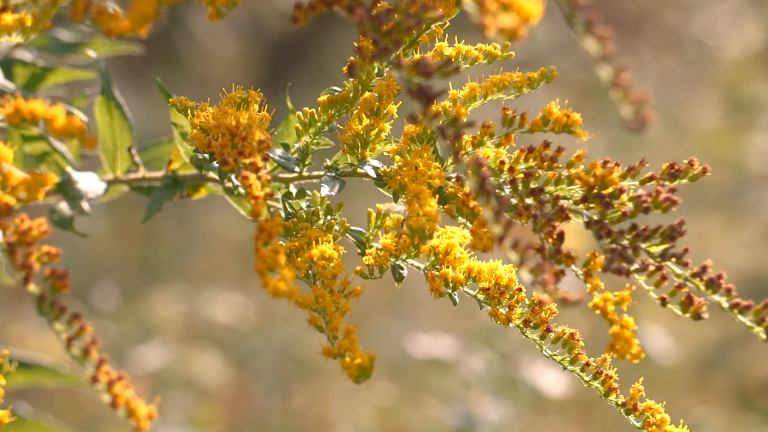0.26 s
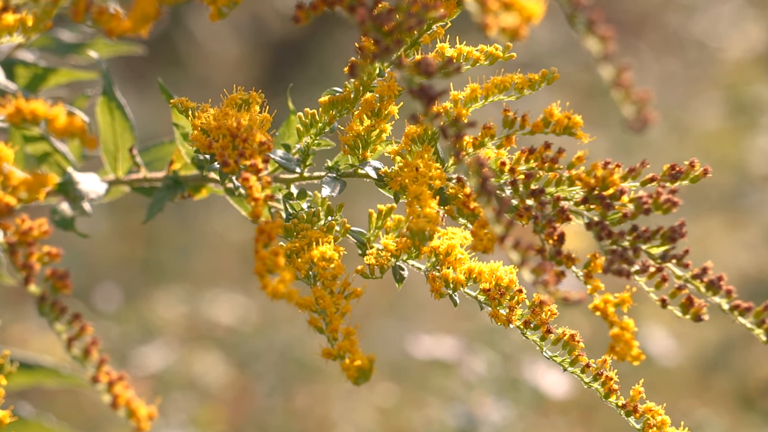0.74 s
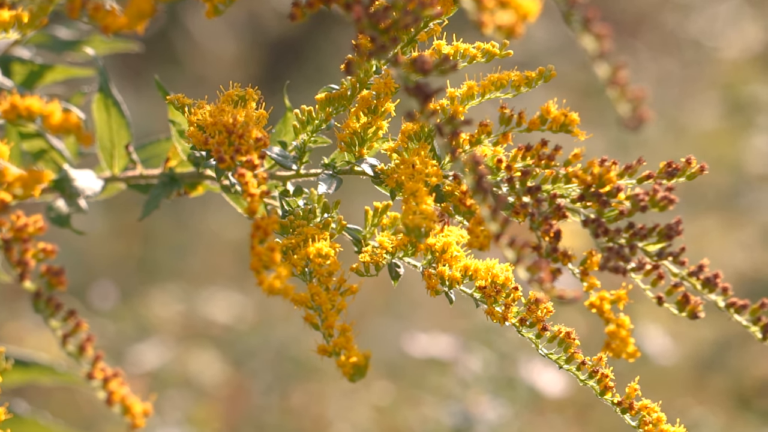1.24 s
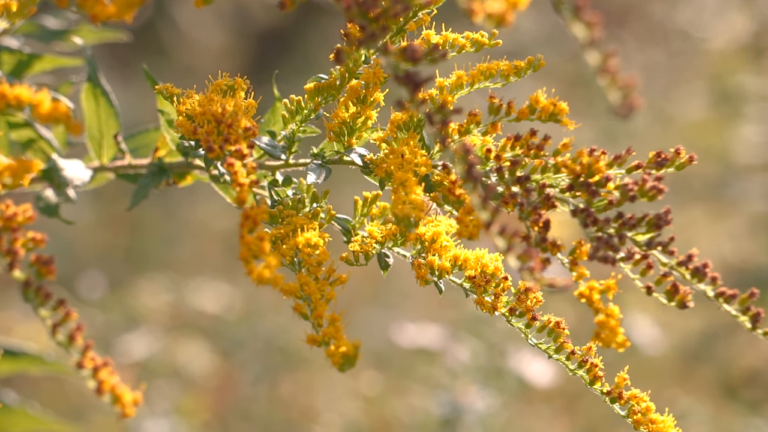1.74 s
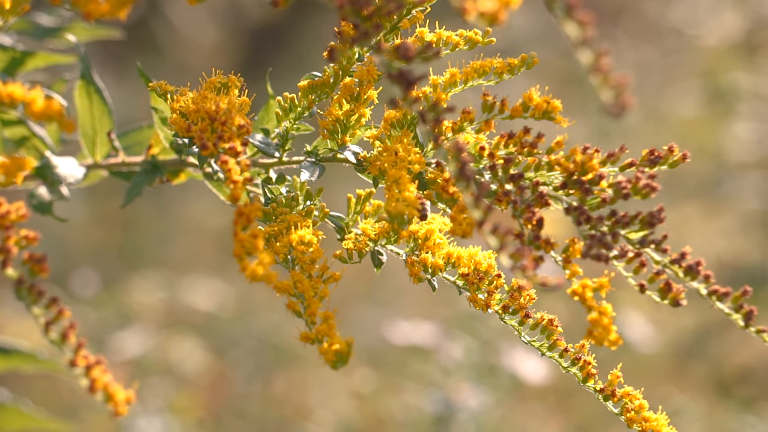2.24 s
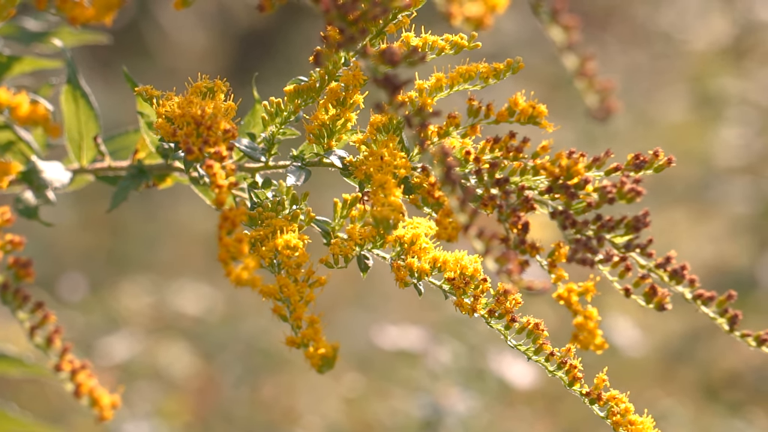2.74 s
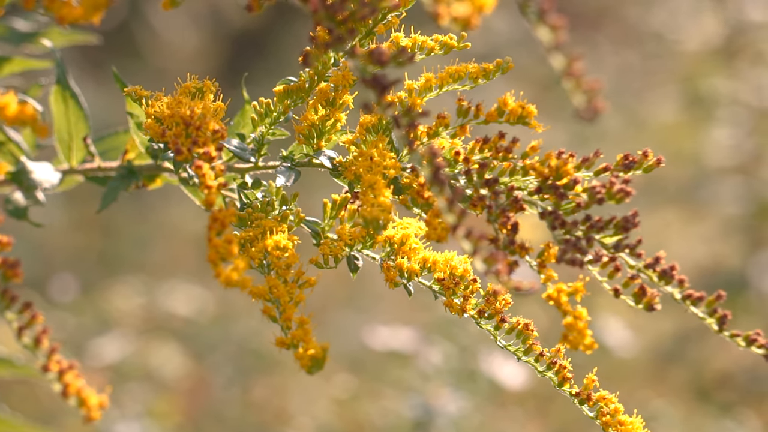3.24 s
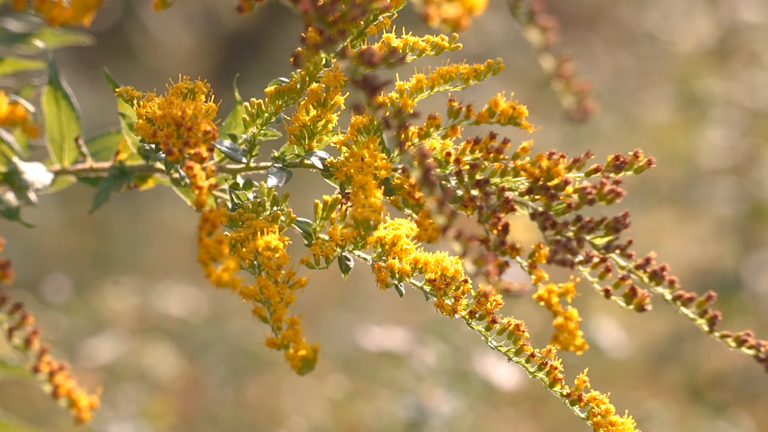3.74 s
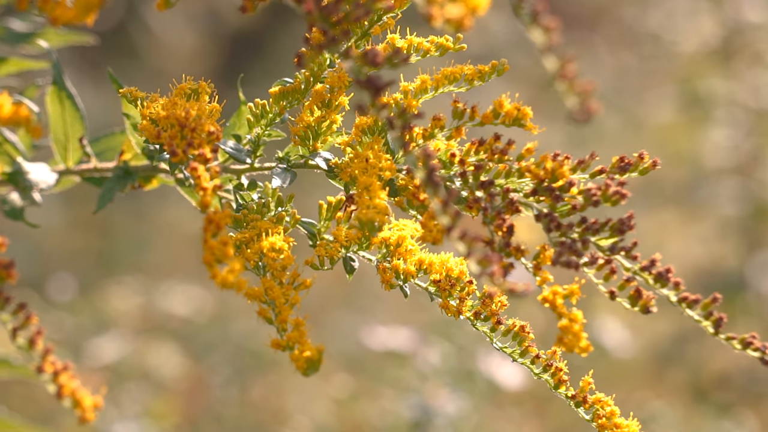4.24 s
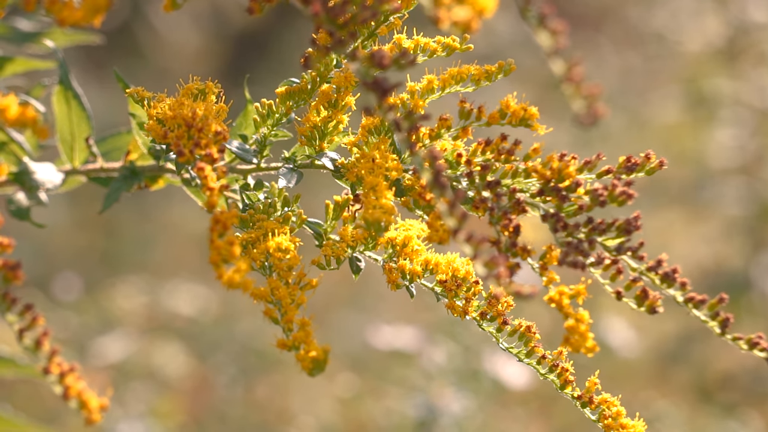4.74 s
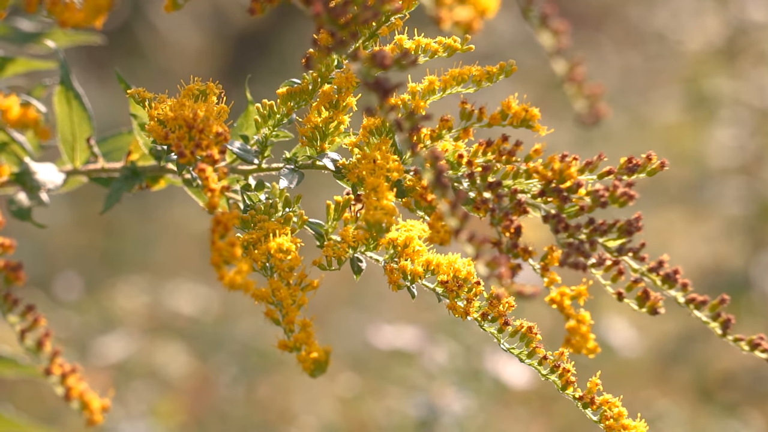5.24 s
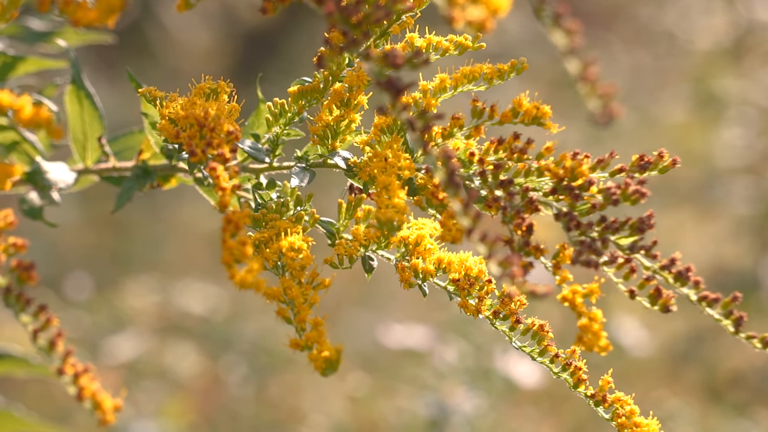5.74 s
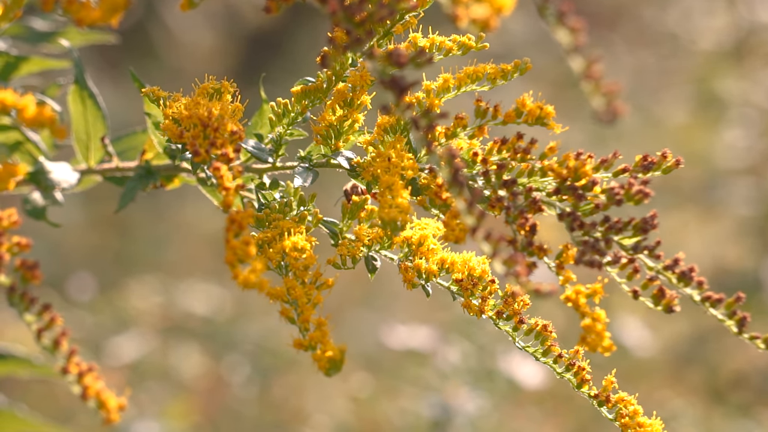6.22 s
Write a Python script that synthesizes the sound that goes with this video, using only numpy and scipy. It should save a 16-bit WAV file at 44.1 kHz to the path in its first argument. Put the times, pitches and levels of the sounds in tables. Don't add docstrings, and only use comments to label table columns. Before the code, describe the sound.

Continuous high cricket trilling, nearest on the left, with pulsing chirps among it and one sharp clicking rasp early on.

```python
import sys
import numpy as np
from scipy import signal
from scipy.io import wavfile
from scipy.ndimage import uniform_filter1d

SR = 44100
rng = np.random.default_rng(int(sys.argv[2]) if len(sys.argv) > 2 else 0)


def dump(signal):
    limited = np.clip(np.atleast_2d(signal).T, -1, 1)
    pcm = np.round(limited * 32767).astype(np.int16)
    wavfile.write(sys.argv[1], SR, pcm)


def gain_from_db(level_db):
    decades = np.asarray(level_db, float) / 20
    return 10 ** decades


N = 285768


def evened(x):
    return x / np.sqrt(np.mean(x ** 2) + 1e-20)


def add(mix, s, sound):
    part = mix[:, max(round(s * SR), 0):][:, :sound.shape[1]]
    part += sound[:, :part.shape[1]]


def strokes(count, first_hz, last_hz, bend, share, late, uneven, left_db, right_db, lead, soft=0.67):
    which, place = np.divmod(count + .5, 1)
    which = (which - which.min()).astype(int)
    luck = rng.standard_normal((which.max() + 1, 3))
    luck[:, 2] = np.cumsum(luck[:, 2])
    size, tune, slip = luck[which].T

    along = np.clip((place - .5) / share + .53, 0, 1)
    hz = first_hz + (last_hz - first_hz) * along ** bend
    hz = hz * (1 + .006 * uneven * tune)
    turns = np.cumsum(hz) / SR
    turns -= turns[np.searchsorted(which, which)]
    angle = 2 * np.pi * turns + (1.4 + 9 * uneven) * slip

    grit = uniform_filter1d(uniform_filter1d(rng.standard_normal(len(hz)), size=80), size=80)
    catch = 1 + .9 * uneven * evened(grit)
    swell = np.sin(np.pi * along ** late) ** soft * gain_from_db(6.7 * uneven * size) * catch
    angle = angle + np.array([[0], [lead]])
    overtone = gain_from_db(-31) * np.cos(3 * angle) if first_hz < 4400 else 0
    return swell * gain_from_db([[left_db], [right_db]]) * (np.cos(angle) + overtone)


def singers():
    # (time [s], lead [strokes])
    near = [(0, -.278), (2.3, -.372), (4.3, -.578), (5.2, -.552), (6.48, -.585)]
    high = [(0, .34), (1.9, .27), (3.2, .39), (3.55, .08), (5.5, -.17), (6.1, -.56), (6.48, -.52)]
    low = [(0, .43), (3, .36), (6.48, .36)]
    middle = [(0, .34), (.6, .37), (2.36, .06), (3.8, .2), (6.48, -.27)]
    sweeper = [(0, .36), (1.8, .5), (5.9, .5), (6.48, .62)]
    thin = [(0, -.05), (.8, .8), (2.4, .2), (4.3, 1.47), (5.3, 1.28), (6.48, .39)]
    beats = [54.3, 19.4, 53.16, 69.49, 68.32, 71.79]
    # (first pitch [Hz], last pitch [Hz], late fall [exponent], sounding share of a stroke [0-1],
    # late peak [exponent], unevenness [0-1], left [dB], right [dB], right leads [rad], soft edges [exponent])
    voices = [
        (4335, 4140, .9, .5, 1.75, .04, 7.5, -11.5, -2.5, .62),
        (8410, 7750, 2, .45, 1.17, .2, -3.5, 7.5, -1.76),
        (4166, 3800, .92, .55, .87, .08, -7.5, 8, -2.5),
        (4820, 4600, .8, .6, 1.1, .18, 7.5, 4.5, -2.1),
        (5580, 4950, 1.06, .55, 1.5, 0.19, 3, 12, 3.1),
        (5870, 5350, 0.72, 0.49, 1.05, 0.22, 10.5, 3, 2.3),
    ]
    # (level at the start [dB], growth [dB/s])
    efforts = [(-25.5, 0.19), (-33, -0.16), (-40, -0.57), (-40.5, 1), (-47.5, 0.17), (-55.5, 1.3)]

    t, out = np.arange(N) / SR, np.zeros((2, N))
    drifts = [near, high, low, middle, sweeper, thin]
    for drift, beat, (db, db_per_s), voice in zip(drifts, beats, efforts, voices):
        count = beat * t + np.interp(t, *np.transpose(drift))
        out += gain_from_db(db + db_per_s * t) * strokes(count, *voice)
    return out


def chirper():
    # (middle stroke [s], level [dB])
    chirps = [(.14, -32), (.528, -30), (.865, -31), (1.409, -33), (1.746, -29.5), (2.116, -32),
              (2.504, -31), (2.852, -33), (3.32, -31), (3.66, -30.5), (4.035, -30.5), (4.334, -30),
              (4.615, -30), (4.928, -31), (5.288, -32), (5.842, -30), (6.281, -30)]
    gap_s, rise_db = .035, 1.5
    out = np.zeros((2, N))
    for s, db in chirps:
        for step in (-1, 0, 1):
            count = np.linspace(-.5, .49, 1400)
            stroke = strokes(count, 5594, 5470, 0.96, 0.6, 0.8, 0.17, -7, 0, 2.2)
            add(out, s + step * gap_s - .016, gain_from_db(db + step * rise_db) * stroke)
    return out


def resonate(x, hz, width):
    turn = np.exp(2j * np.pi * hz * np.arange(x.shape[-1]) / SR)
    r = np.exp(-np.pi * width / SR)
    return 2 * (turn * signal.lfilter([1 - r], [1, -r], x / turn)).real


def katydid():
    # (time [s], length [s], level [dB], left over right [dB], thinness [dB/kHz])
    rasps = [(.918, .01, -44, 0, 0), (.942, .011, -33, 7, 1), (0.96, 0.014, -28.5, 8, 2.5),
             (1.713, .011, -35, 0, 2), (1.739, .011, -28, -1, 3), (1.759, 0.014, -25, 0, 2),
             (1.7876, 0.015, -10.5, 1.5, 0.5), (3.28, .02, -45, 0, 1), (4, .03, -46, 0, 1),
             (5.25, .02, -44, 0, 1), (5.8, .02, -45, 0, 1)]
    # (pitch [Hz], width [Hz], left [dB], right [dB])
    wing = [(10300, 1700, -3, -8), (11950, 1500, 1.5, -9), (12700, 1400, -1.5, -1), (14500, 1500, -9, 0),
            (15100, 1300, -6, -6)]
    out = np.zeros((2, N))
    for s, length, db, lean_db, thin_db in rasps:
        along = np.linspace(0, 1, round(length * SR))
        luck = rng.random((1500, 3))[:len(along)]
        struck = luck[:, 0] < 16000 / SR
        teeth = struck * np.sign(luck[:, 1] - .5) * gain_from_db(5.8 * luck[:, 2])
        pressure = np.minimum((along / .3) ** 2 + .15, 1)
        scrape = np.pad(evened(teeth) * pressure, (0, 300))
        for k, (hz, width, left_db, right_db) in enumerate(wing):
            sides_db = np.array([[left_db + lean_db / 2], [right_db - lean_db / 2]])
            level_db = db + thin_db * (hz - 13500) / 1000 + sides_db
            ring = resonate(resonate(scrape, hz, width), hz, width)
            add(out, s, (-1) ** k * 1.1 * gain_from_db(level_db) * ring)
    return out


def grass(x, t60):
    taps = np.zeros((2, SR // 4))
    at = np.arange(60, SR // 4 - 20, 20) + rng.integers(0, 20, (2, (SR // 4 - 61) // 20))
    np.put_along_axis(taps, at, rng.choice([-1., 1.], at.shape), 1)
    taps *= gain_from_db(-60 * np.arange(SR // 4) / SR / t60)
    return signal.fftconvolve(x, taps / np.linalg.norm(taps[0]), axes=1)[:, :N]


def read(points, hz):
    f, *columns = np.transpose(points)
    return np.array([np.interp(np.log(hz + 1), np.log(f + 1), c) for c in columns])


def hiss(db_of, patchy_db):
    # (pitch [Hz], left-right likeness [0-1], right leads [rad])
    ports = [(30, .99, .1), (90, .93, .35), (260, .65, 1.3), (430, .67, 2.0), (700, .68, 2.4),
             (1300, .58, 2.4), (2000, .38, 2.3), (3000, .18, 2.4), (4500, .4, 4.0), (6200, .13, 3.0),
             (8300, .35, 4.5), (11000, .2, 5.8), (16000, .2, 4.8)]
    frames, hz = N // 256 + 5, np.fft.rfftfreq(1024, 1 / SR)
    a, b, c, d, patches = rng.standard_normal((frames, 513, 5)).T
    patches = evened(uniform_filter1d(uniform_filter1d(patches, 10, 0), 12, 1))
    same, lead = read(ports, hz)[:, :, None]
    left = a + 1j * b
    right = same * left * np.exp(1j * lead) + np.sqrt(1 - same ** 2) * (c + 1j * d)
    z = np.array([left, right]) * gain_from_db(db_of(hz)[:, :, None] + patchy_db * patches)
    return np.sqrt(SR / 1024) * signal.istft(z, nperseg=1024, noverlap=768)[1][:, :N]


def crowd():
    # (pitch [Hz], left [dB per Hz], right [dB per Hz])
    low_kinds = [(2630, -105, -111), (3550, -74, -76), (3750, -72, -73.5), (3924, -69, -59),
                 (4164, -53, -58.5), (4310, -66, -67), (4500, -72, -71), (4630, -62, -62),
                 (5140, -71.5, -70.5), (5504, -70, -71.5), (5900, -84, -74.5), (5850, -89, -102)]
    high_kinds = [(5880, -96.5, -96.5), (7150, -82, -77.5), (7844, -63, -68.5), (8310, -62, -60.5),
                  (8500, -65.5, -62), (8750, -70.5, -69.5), (9044, -68.5, -69.5), (9280, -91, -116),
                  (9800, -105, -105)]

    def colour_db(hz):
        return 20 * np.log10(gain_from_db(read(low_kinds, hz)) + gain_from_db(read(high_kinds, hz)))

    t, out = np.arange(N) / SR, hiss(colour_db, 0.38)
    for k, (pick, pace, side, turn) in enumerate(rng.random((16, 4))):
        high = k % 2
        pick = (k + 2 * pick) / 17
        hz = 7700 + 1400 * pick if high else 4650 + 1000 * pick
        beat = 17 + 4 * pace if high else 48 + 26 * pace
        sides_db = 5 * (side - .5) * np.array([1, -1])
        left_db, right_db = colour_db(np.array([hz]))[:, 0] + 25.5 - 4.5 * high + sides_db
        out += strokes(beat * t + turn, hz * 1.025, hz * .975, 1.213, 0.53, 2.4, 0.185,
                       left_db, right_db, 2 * np.pi * turn)
    return out


def hoots():
    # (time [s], length [s], pitch [Hz], level [dB], left over right [dB])
    far_calls = [(0.684, .14, 2240, -50.5, -5), (0.778, .14, 1700, -53, 1), (2.38, 0.17, 2200, -58, -9),
                 (0.054, 0.37, 1510, -56, 6), (2.18, .77, 1440, -62, 9), (4.246, 0.58, 1410, -58.5, -3),
                 (4.847, .45, 1394, -56.5, 4), (5.4, .6, 1510, -61, -1), (0, 0.44, 286, -55, 3),
                 (0.905, .22, 383, -59, 4), (0.979, 0.21, 255, -56.5, 8)]
    # (pitch [Hz], width [Hz], level [dB], left over right [dB])
    hums = [(116, 8, -78, 0), (173, 8, -69, 0), (12887, 8, -77, 8), (12947, 4, -70, 8), (13007, 8, -73, 8)]
    hoot_width_hz = 95
    out = np.zeros((2, N))
    tones = [(s, length, hz, hoot_width_hz, db, lean_db) for s, length, hz, db, lean_db in far_calls]
    tones += [(0, N / SR, *hum) for hum in hums]
    for s, length, hz, width, db, lean_db in tones:
        breath = rng.standard_normal(SR if length < .8 else N + SR)[:round((length + .2) * SR)]
        tone = evened(resonate(resonate(breath, hz, width), hz, width))
        tone = tone[round(.2 * SR):]
        fade = signal.windows.tukey(len(tone), min(.8, .2 / length))
        add(out, s, gain_from_db([[db + lean_db / 2], [db - lean_db / 2]]) * tone * fade)
    return out


def air():
    # (pitch [Hz], level [dB per Hz])
    colour = [(25, -122), (60, -101), (110, -91), (250, -78), (500, -73.5), (1000, -74), (2000, -78.5),
              (3500, -79.5), (6200, -84), (9400, -85), (10500, -84), (13500, -86), (14500, -85),
              (15500, -81)]
    # (pitch [Hz], left over right [dB])
    balance = [(60, -1), (180, 0), (550, 2), (1650, 4), (6000, 0.5), (15000, 1)]
    halves = np.array([[.5], [-.5]])
    return hiss(lambda hz: read(colour, hz) + read(balance, hz) * halves, 0.86)


def scene():
    trill, rasp = singers() + chirper(), katydid()
    echo = gain_from_db(-14) * np.pad(trill, ((0, 0), (round(.0055 * SR), 0)))[:, :N]
    scatter = gain_from_db(-16) * grass(trill[::-1], .17)
    rasp_tail = gain_from_db(-10) * grass(rasp, .14)
    return trill + echo + scatter + rasp + rasp_tail + crowd() + hoots() + air()


def drop_masked(x):
    # (from [Hz], to [Hz], level against the usual below which a band drops [dB])
    masked = [(1900, 3650, -2), (5880, 6400, -.3), (6400, 6950, -1.8), (6950, 7250, -.6), (9200, 9600, .7),
              (9600, 10300, 0), (10300, 20000, -2.8)]
    unmasked_db = -9
    window = np.sin(np.pi * (np.arange(2048) + .5) / 2048)
    frame = dict(window=window, nperseg=2048, noverlap=1024)
    hz, _, z = signal.stft(x, SR, **frame)
    band = np.arange(len(hz)) // 6
    power = np.add.reduceat((abs(z) ** 2).sum(0), np.arange(0, len(hz), 6), axis=0)
    power = uniform_filter1d(power, size=2, axis=1)
    usual = np.median(power, axis=1, keepdims=True)
    under_db = unmasked_db + sum((db - unmasked_db) * ((hz >= lo) & (hz < hi)) for lo, hi, db in masked)
    kept = power[band] > usual[band] * gain_from_db(2 * under_db)[:, None]
    return signal.istft(z * kept, SR, **frame)[1][:, :N]


def low_pass(x):
    return signal.sosfilt(signal.butter(12, 15760, fs=SR, output="sos"), x)


def record(dry):
    rolloff = signal.butter(2, 70, "highpass", fs=SR, output="sos")
    mix = drop_masked(signal.sosfilt(rolloff, dry))
    return low_pass(mix)


dry = scene()
out = record(dry)
dump(out)
```